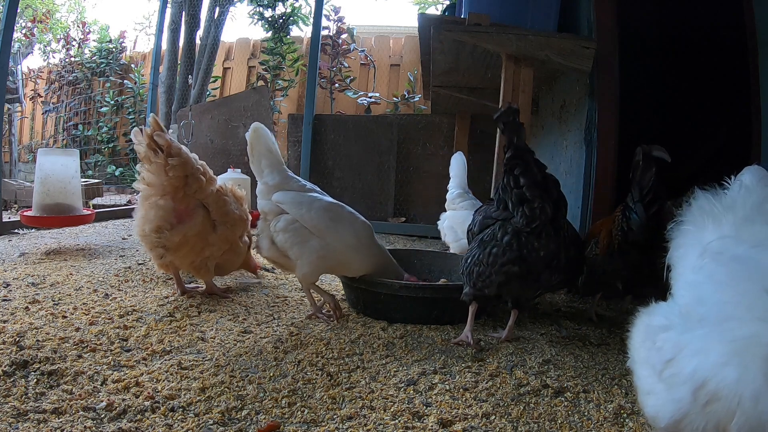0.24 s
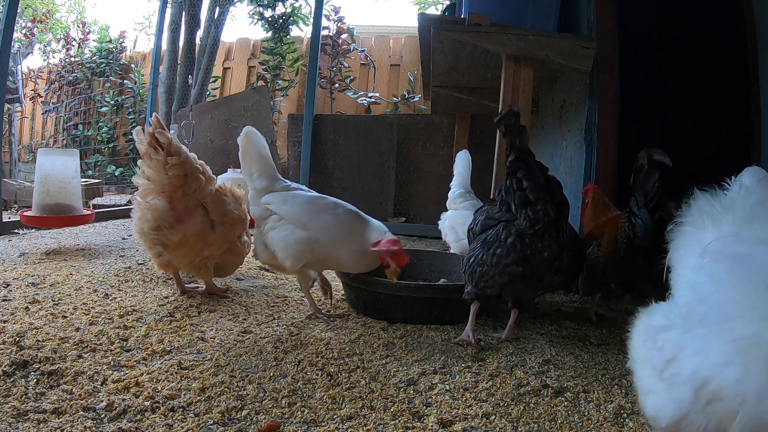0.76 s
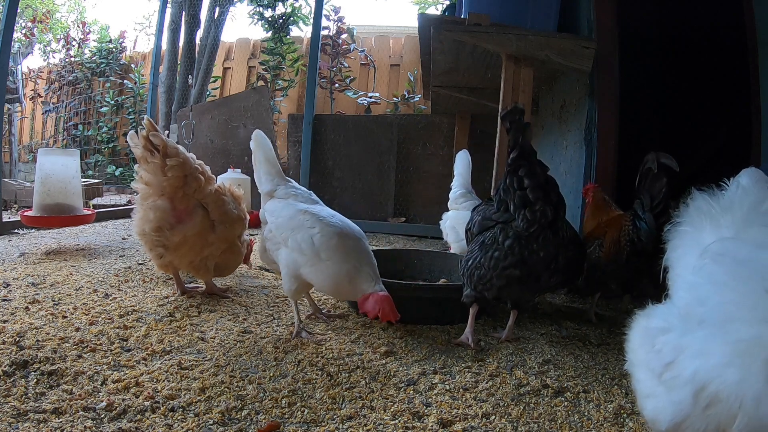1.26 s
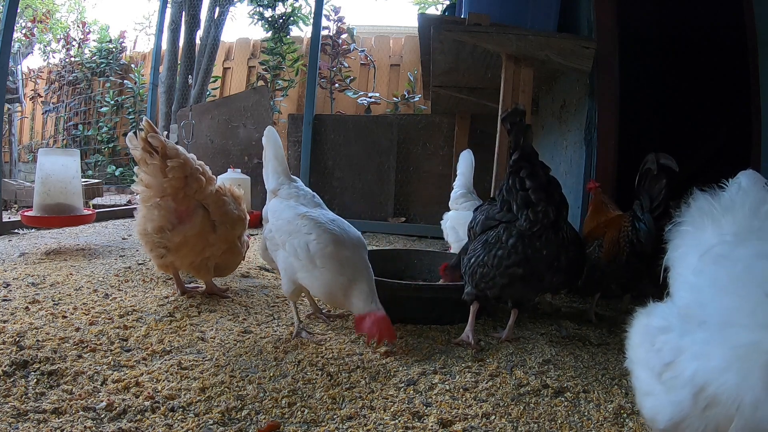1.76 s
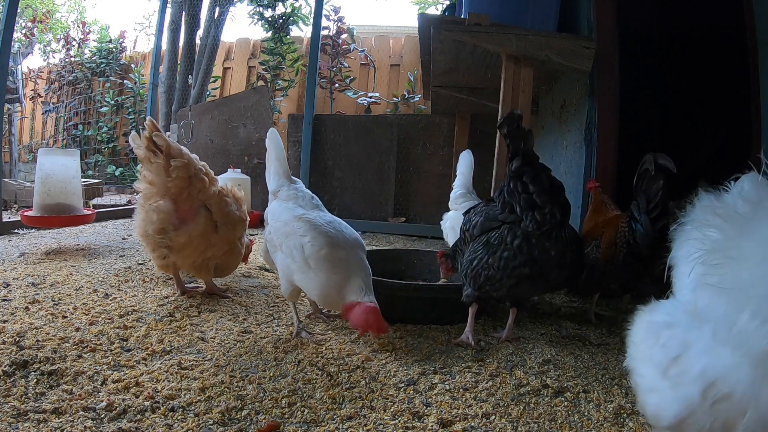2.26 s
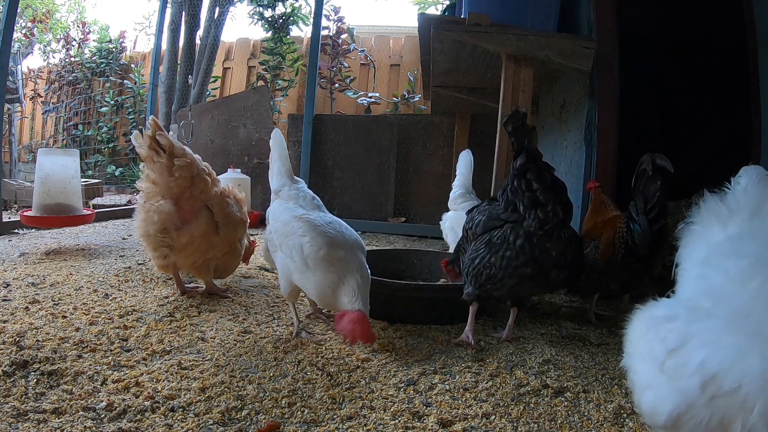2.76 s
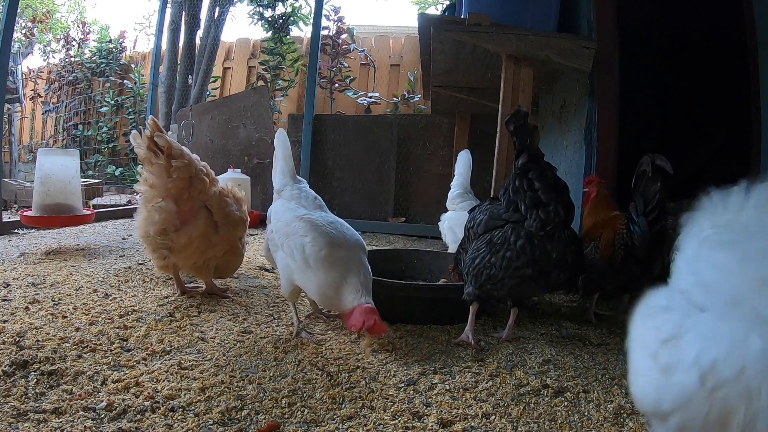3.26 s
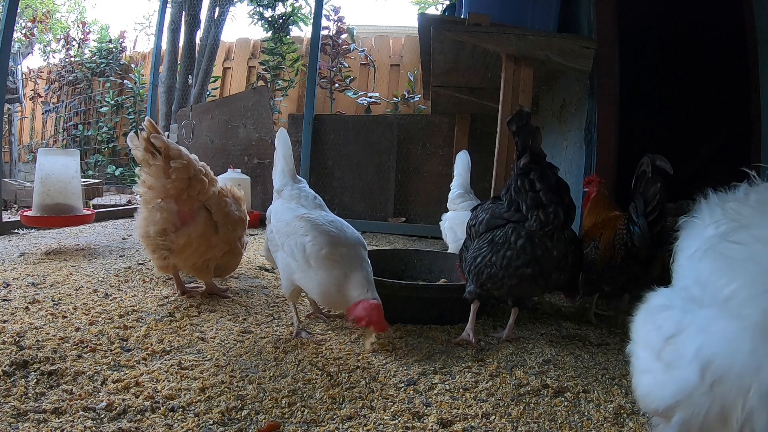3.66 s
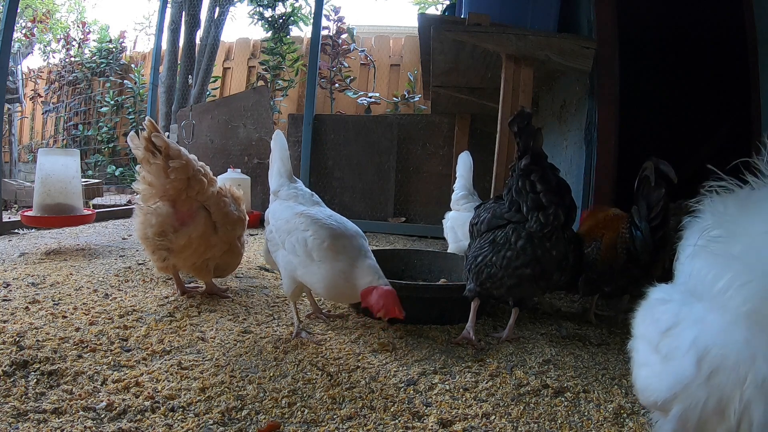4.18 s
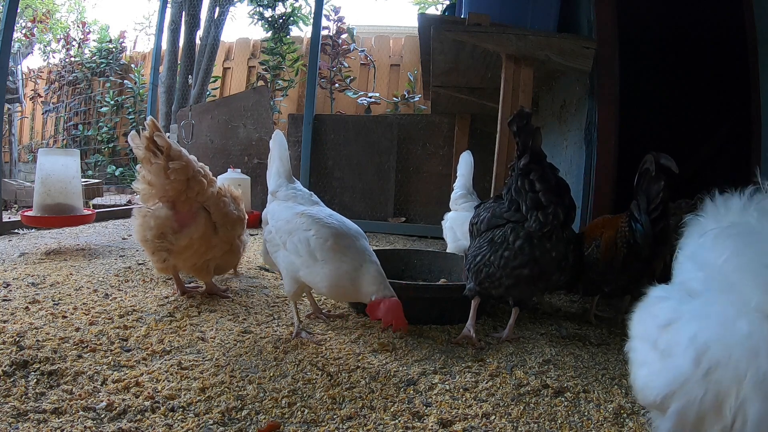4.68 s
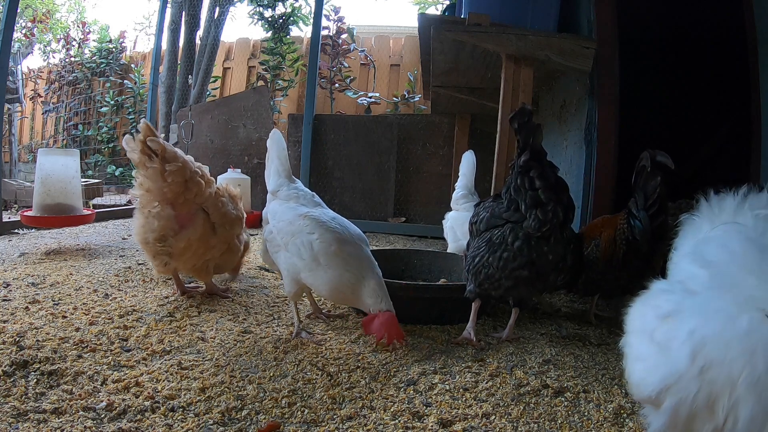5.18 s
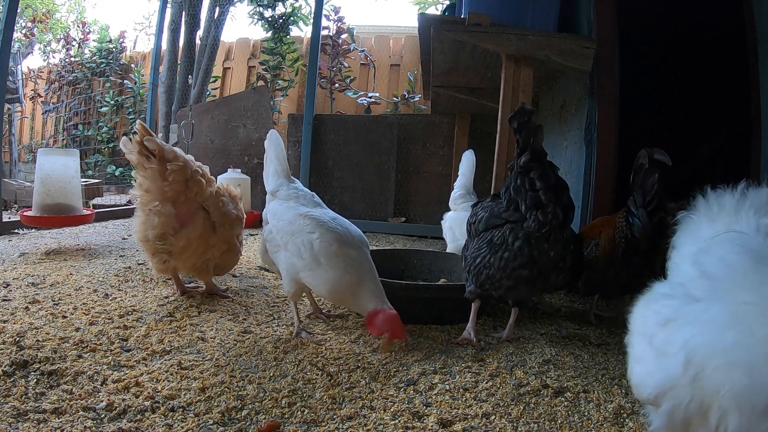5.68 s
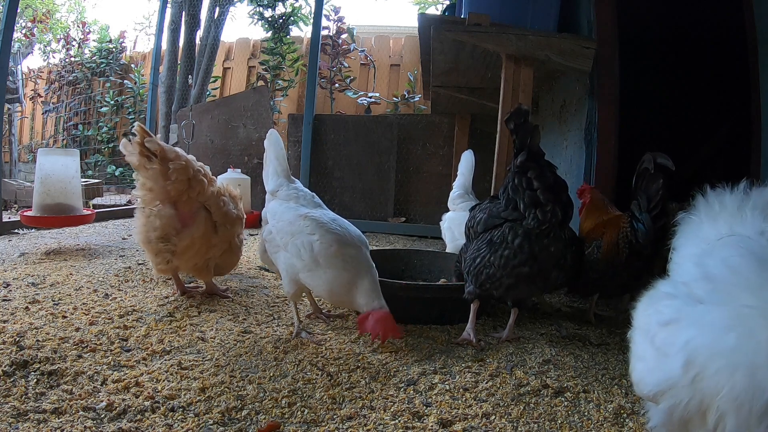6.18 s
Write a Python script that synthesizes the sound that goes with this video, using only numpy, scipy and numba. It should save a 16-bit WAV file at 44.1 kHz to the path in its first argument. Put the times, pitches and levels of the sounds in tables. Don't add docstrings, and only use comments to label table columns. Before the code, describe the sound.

Close chicken cackling: drawn-out rough squawks that break into clear notes, then rapid short rising calls, with soft pecking ticks and wind rumble.

```python
import sys
import numpy as np
from scipy import signal
from scipy.fft import rfft, irfft
from scipy.io import wavfile
from scipy.ndimage import uniform_filter1d
from numba import njit

SR = 44100
rng = np.random.default_rng(int(sys.argv[2]) if len(sys.argv) > 2 else 0)


def to_wav(s):
    ch = np.atleast_2d(s).T
    pcm = np.round(np.clip(ch, -1, 1) * 32767)
    wavfile.write(sys.argv[1], SR, pcm.astype(np.int16))


def invert_db(x):
    u = np.asarray(x, float) / 20
    return 10 ** u


N = 284004

# [start t/s, membranes begin to lock t/s, breath begins to fail t/s, release time/s]
CALLS_S = [
    (0, .88, 1.218, .022),
    (1.612, 2.12, 2.442, 0.018),
    (2.7, 2.897, 3.176, .012),
    (3.395, 3.454, 3.716, .028),
    (3.912, 3.985, 4.186, .03),
    (4.492, 4.63, 4.937, 0.03),
    (5.079, 5.07, 5.223, .038),
    (5.526, 5.54, 5.84, .05),
    (5.977, 5.947, 6.156, 0.038),
]
# [t/s, f/Hz]
PITCH = [
    [(2.13, 360), (2.25, 365), (2.3, 378), (2.328, 384.6), (2.414, 388.2), (2.44, 369.3), (2.47, 367)],
    [(2.93, 350.8), (2.97, 355), (2.99, 369.5), (3.154, 384.9), (3.185, 386.9)],
    [(3.44, 332.1), (3.472, 329.3), (3.528, 364.2), (3.578, 371.2), (3.67, 399), (3.712, 383.5),
     (3.73, 382.7)],
    [(3.99, 346.7), (4.016, 372), (4.088, 387.4), (4.11, 426.8), (4.19, 419.6), (4.22, 372.2)],
    [(4.51, 299.1), (4.558, 353), (4.578, 397.5), (4.658, 420.2), (4.806, 419.4), (4.846, 428.7),
     (4.93, 418.5), (4.985, 382)],
    [(5.08, 308), (5.1, 392), (5.122, 400.5), (5.154, 418.4), (5.22, 422.3), (5.265, 324)],
    [(5.535, 342), (5.573, 410.5), (5.719, 431.4), (5.753, 445.6), (5.831, 453.5), (5.857, 438),
     (5.9, 340.6)],
    [(5.98, 329.0), (5.996, 395), (6.01, 433), (6.028, 439), (6.064, 441.4), (6.146, 432), (6.166, 424),
     (6.19, 339.4)],
]
# [settling time/s, rasp left 0-1, strong-weak beat from t/s, beat depth 0-1]
LOCK = [(.02, 1, 0, 0), (.024, .008, 0, 0), (.014, .01, 0, 0), (.042, .01, 0, 0), (.028, .04, 4.06, .36),
        (.065, .16, 4.68, .28), (.014, .09, 5.14, .12), (.055, .07, 5.73, .25), (.03, .05, 6.05, .36)]
# [treble at start level/dB, as note settles level/dB, at end level/dB,
# 3 kHz mouth cavity at start level/dB, at end level/dB]
GAPE = [(-37, -18.5, -14, -4.5, -9.5), (-21.5, -9.5, -3.5, -8.5, -14), (-13.5, -6, -4, -16, -11),
        (-14, -3, -3, -12, -13), (-10, -5, -3.5, -19.5, -1), (-13, -5, -4, -6, 2),
        (-16, -9.5, -2, 0.5, -0.5), (-13, -0.5, -2, -2.5, -5), (-13.5, -2.5, -3, -13.5, -3.5)]


def hen():
    rasp_share, alternation = syrinx()
    harsh, rough_air = rasp()
    chest, throat, note_air = note(alternation)
    note_share = np.sqrt(1 - rasp_share * rasp_share)
    body = rasp_share * harsh + note_share * throat
    bright = beak(rasp_share * rough_air + note_share * note_air)
    level_db, treble_db = effort()
    t = np.arange(N) / SR
    breath = np.zeros(N)
    for k, (start, _, end, release) in enumerate(CALLS_S):
        opening = (t - start) / 0.0009 + (k == 0)
        closing = (end + release - t) / 0.038 + 1
        breath += np.clip(np.minimum(opening, closing), 0, 1)
    voiced = sum((t > curve[0][0]) * (t < curve[-1][0]) for curve in PITCH)
    chest = uniform_filter1d(voiced * 1.0, size=300) * chest
    return breath * invert_db(level_db - .4) * (body + invert_db(treble_db) * bright + chest)


def syrinx():
    beat_rasp, beat_grows_s, fray, fray_s = .22, .06, .45, .04
    crack_share, crack_s, crack_width_s = .3, 5.78, .025
    t = np.arange(N) / SR
    share, beat = np.ones(N), np.zeros(N)
    for (start, lock, end, release), (settle, left, beat_s, depth) in zip(CALLS_S, LOCK):
        now = (t >= start) & (t < end + release + fray_s)
        beat[now] = depth * np.clip((t[now] - beat_s) / beat_grows_s, 0, 1)
        unlocked = np.exp(-np.maximum(t[now] - lock, 0) / settle)
        frayed = np.clip((t[now] - end) / fray_s + .5, 0, 1)
        share[now] = left + (1 - left) * unlocked + beat_rasp * beat[now] + fray * frayed
    crack = crack_share * np.exp(-((t - crack_s) / crack_width_s) ** 2)
    return np.clip(share + crack, 0, 1), beat


def effort():
    # [attack climb level/dB, top of attack level/dB, last of rasp level/dB,
    # settled note level/dB, end level/dB]
    push = [(-6, -41.5, -31, -31.5, -28), (7.5, -34.5, -30, -33, -34.5), (6.5, -30, -25.5, -33.5, -35),
            (9.5, -26, -27.5, -35, -34), (19, -33.5, -28.5, -36.5, -27.5), (15, -34, -30, -28.5, -27.5),
            (13, -28.5, -28.5, -28, -29), (9, -33, -33.5, -32, -30.5), (14, -32, -31.5, -31.5, -30)]
    attack_s, release_db = 0.022, 19.5
    start, lock, end, release = np.transpose(CALLS_S)
    settled = np.minimum(lock + 2 * np.transpose(LOCK)[0], end)
    climb, first, last, calm, final = np.transpose(push)
    level_db, = by_call([start, start + attack_s, lock, settled, end, end + release],
                        [first - climb, first, last, calm, final, final - release_db])
    treble_db, = by_call([start, settled, end], np.transpose(GAPE)[:3])
    return level_db, treble_db


def rasp(hiss=1.0, halving=0.46, interval=1.2):
    # [t/s, top f/Hz, hold time/s]
    warble = [
        (-.03, 592, 0.024),
        (0.037, 687, 0.026),
        (0.117, 586.5, 0.049),
        (0.209, 634, 0.028),
        (0.291, 673, .02),
    ]
    # [lower membrane f/Hz, rising to f/Hz, upper membrane strength (about 0-1),
    # lower throat level/dB, closing to level/dB]
    membranes = [(530, 590, .9, 5, -3.5), (540.2, 606, 1.1, 3, -5), (513.6, 592, .18, -2.5, -6),
                 (518.5, 570, .2, -4, -8.5), (567, 585, .43, 3, -13.5), (520, 610, 0.6, 0, -13),
                 (600, 600, .36, -8, -8), (579, 580, .42, -9, -6), (590, 550, 0.3, -11, -10)]
    # [f/Hz, width/Hz, level/dB]
    low_throat = [(298, 103, -1.5), (574, 287, -7.5), (755, 62, -1.5)]
    # [f/Hz, width/Hz, level/dB]
    main_throat = [(951, 95, -2.5), (1216, 129, 3.5), (1480, 240, -6.5), (2150, 317, -11)]
    rest_hz, warble_end_s, jitter, burst_db = 492.3, .3, .057, 2.4
    t = np.arange(N) / SR
    start, lock, *_ = np.transpose(CALLS_S)
    first_hz, last_hz, strength, open_db, closed_db = np.transpose(membranes)
    hz, upper, low_db = by_call([start, lock], [first_hz, last_hz], [strength, strength], [open_db, closed_db])
    wild = np.clip((t - warble_end_s) / .12 + 0.24, .22, 1)
    upper_phase = 2 * np.pi * np.cumsum(interval * hz * (1 + jitter / 2 * drift(109.2))) / SR
    for s, top_hz, hold in warble:
        slide = np.clip(1 - (t - s - hold) / .025, 0, 1)
        hz = np.where((t >= s) & (t < warble_end_s), rest_hz + (top_hz - rest_hz) * slide, hz)
    hz = uniform_filter1d(hz, size=300)
    phase = 2 * np.pi * np.cumsum(hz * (1 + jitter * wild * drift(148.9))) / SR
    puffs = pulses(phase, .42 + 0.31 * wild) * (1 + halving * wild * np.cos(phase / 2) * drift(56))
    puffs = puffs + upper * wild ** 2 * pulses(upper_phase, 0.58) * (1 + 0.12 * puffs)
    gated = hiss * wild * rng.standard_normal(N) * (1 + np.cos(phase))
    flow = (puffs + gated) * invert_db(burst_db * wild * np.clip(drift(100), -3, 1.6))
    return even(invert_db(low_db) * tract(flow, low_throat) - tract(flow, main_throat)), flow


def note(alternation):
    # [chest tone under the effort level/dB, upper throat at top pitch level/dB,
    # windpipe at start level/dB, at end level/dB, lower throat f/Hz]
    colour = [(-22.5, 1, -6, 3, 760), (-23, 2, 1, 1, 770), (-22, 6, -6, -10, 770), (-18, 3, -2, 8, 830),
              (-19, 0, 7, 0, 845), (-18, -3, 14, 0, 840), (-13.5, 5, 0, 0, 840), (-13, 6, 11, 7, 860)]
    # [f/Hz, width/Hz, level/dB]
    upper_throat = [(1570, 430, -4), (2100, 338, -5)]
    throat_db_per_hz = 0.17
    jitter, shimmer_db, flicker_db = .004, 1.2, 2.5
    steady_rough, beat_rough, hiss = .1, 1.0, 1.7
    rows = []
    for curve, (chest, upper, early, late, low) in zip(PITCH, colour):
        top = max(np.transpose(curve)[1])
        for s, hz in curve:
            windpipe = np.interp(s, [curve[0][0], curve[-1][0]], [early, late])
            rows.append((s, hz, top, chest, upper, windpipe, low))
    hz, top_hz, chest_db, open_db, windpipe_db, low_hz = in_time(rows)
    open_db = open_db - throat_db_per_hz * (top_hz - hz)
    phase = 2 * np.pi * np.cumsum(hz * (1 + jitter * drift(25))) / SR
    swell = invert_db(shimmer_db * drift(12))
    roughness = (steady_rough + beat_rough * alternation) * drift(250)
    puffs = snaps(phase) * (1 + alternation * np.cos(phase / 2) + roughness) * swell
    gated = hiss * rng.standard_normal(N) * (1 + .5 * np.cos(phase))
    lower = invert_db(flicker_db * drift(15)) * moving_resonance(puffs, low_hz, 200)
    windpipe = invert_db(windpipe_db - 9.5) * tract(puffs, [(1272, 280, 0.002)])
    throat = lower - windpipe + invert_db(open_db - 9.0) * tract(puffs, upper_throat)
    return invert_db(chest_db + 12.0) * np.sin(phase), even(throat), puffs + gated


def beak(x, width_hz=450, upper_db=-1.5, top_db=-7.0):
    # [lower at start f/Hz, at end f/Hz, upper at start f/Hz, at end f/Hz, upper cavity level/dB]
    resonances = [(3100, 3790, 5300, 6710, -8.5), (3780, 3380, 6590, 6210, -8.5),
                  (3600, 3710, 6210, 6170, -17.5), (3670, 3650, 6230, 6230, -14),
                  (3630, 3680, 6500, 5710, -14.5), (3560, 3550, 5980, 5500, -9.5),
                  (3530, 3690, 5700, 5790, -12), (3730, 3790, 5920, 6140, -11),
                  (3681, 3780, 6166, 5960, -13.5)]
    patchy_db, air_db = 2.5, -41
    start, _, end, _ = np.transpose(CALLS_S)
    shape = np.transpose(resonances)
    lower_hz, upper_hz, first_db, second_db = by_call(
        [start, end], shape[:2], shape[2:4], np.transpose(GAPE)[3:], shape[[4, 4]])
    lower, upper, top = (moving_resonance(x, hz, width_hz) * invert_db(patchy_db * drift(14))
                         for hz in (lower_hz, upper_hz, 1.204 * upper_hz))
    first_cavity = invert_db(first_db) * tract(x, [(3000, 373, 0.0032)])
    second_cavity = invert_db(second_db) * tract(x, [(4320, 660, 0.049)])
    y = first_cavity + second_cavity - lower - invert_db(upper_db) * upper
    y = y + invert_db(top_db) * (top - tract(x, [(9300, 2000, -13.5)]))
    y = signal.sosfilt(signal.butter(5, (2780, 8700), "band", fs=SR, output="sos"), y)
    return even(y + invert_db(air_db) * tract(x, [(13100, 2000, 0.0028)]))


def pulses(phase, sharp=0.9916):
    return (1 - sharp ** 2) / (1 - 2 * sharp * np.cos(phase) + sharp ** 2) - 1


def snaps(phase, count=34):
    return np.sin((count + .5) * phase) / (np.sin(phase / 2) + 1e-12) - 1


def resonate(x, hz, width):
    r = np.exp(-np.pi * width / SR)
    return signal.lfilter(np.array([1, 0, -1]) * (1 - r * r) / 2, [1, -2 * r * np.cos(2 * np.pi * hz / SR), r * r], x)


def tract(x, modes):
    out = 0
    for k, (hz, width, level_db) in enumerate(modes):
        once = resonate(x, hz, 1.98 * width)
        out = out + (-1) ** k * invert_db(level_db) * resonate(once, hz, 1.98 * width)
    return out


def moving_resonance(x, hz, width):
    r = np.exp(-np.pi * width / SR)
    return glide(x, 2 * r * np.cos(2 * np.pi * hz / SR), r)


@njit
def glide(x, pull, r):
    for _ in range(2):
        y = np.zeros(len(x))
        for i in range(2, len(x)):
            y[i] = (1 - r * r) / 2 * (x[i] - x[i - 2]) + pull[i] * y[i - 1] - r * r * y[i - 2]
        x = y
    return x


def even(y):
    return y / np.sqrt(uniform_filter1d(y ** 2, size=3000) + 1e-12)


def rms_one(x):
    return x / np.sqrt(np.mean(x ** 2) + 1e-20)


def drift(rate):
    r = np.exp(-2 * np.pi * rate / SR)
    wander = signal.lfilter([1], [1, -2 * r, r * r], rng.standard_normal(N + SR // 8))
    return rms_one(wander[SR // 8:])


def in_time(rows):
    s, *columns = np.transpose(rows)
    return [np.interp(np.arange(N) / SR, s, c) for c in columns]


def by_call(moments, *columns):
    s = np.maximum.accumulate(np.transpose(moments).ravel())
    return in_time(np.transpose([s] + [np.transpose(c).ravel() for c in columns]))


def ticks(events, decay_s, broad, cut_hz):
    out, t = np.zeros(N), np.arange(1800) / SR
    for s, peak_db, hz in events:
        puff = rng.standard_normal(1800) * np.exp(-t / decay_s)
        out[round(s * SR):][:1800] += invert_db(peak_db - 6.0) * (4.4 * resonate(puff, hz, 0.24 * hz) + broad * puff)
    return signal.sosfilt(signal.butter(2, cut_hz, fs=SR, output="sos"), out + 1e-18)


def shed(x):
    t60_s, level_db, low_cut_hz = 0.23, 0, 450
    hollow_hz, hollow_width_hz, hollow_t60_s, hollow_db = 770, 120, .47, -18
    t = np.arange(SR // 2) / SR
    white = rng.standard_normal((2, len(t))) * (t > .003)
    hollow = resonate(white * invert_db(hollow_db - 60 * t / hollow_t60_s), hollow_hz, hollow_width_hz)
    echoes = white * invert_db(-60 * t / t60_s) + hollow
    echoes = signal.sosfilt(signal.butter(2, low_cut_hz, "high", fs=SR, output="sos"), echoes)
    echoes /= np.sqrt(np.sum(echoes ** 2, axis=1)[:, None])
    return invert_db(level_db) * signal.fftconvolve(echoes, x[None], axes=1)[:, :N]


def gusts():
    # [arrives t/s, hold time/s, boom level/dB]
    blows = [(0, .01, -65), (0.344, .1, -72), (2.151, .06, -70), (3.213, .01, -61), (3.42, 0.15, -58.5),
             (3.639, 0.17, -51), (4.164, 0.021, -41.5), (4.5, .1, -44), (4.68, 0.079, -40),
             (4.85, 0.077, -45), (5.14, 0.19, -42), (5.42, .04, -46), (5.6, .1, -44), (6.04, .15, -47.5)]
    boom_hz, rise_db_per_s, fall_db_per_s = 56.2, 220, 110
    t = np.arange(N) / SR
    levels = []
    for s, hold, boom_db in blows:
        rise = rise_db_per_s * np.maximum(s - t, 0)
        fall = fall_db_per_s * np.maximum(t - s - hold, 0)
        levels.append(boom_db - rise - fall)
    white = rng.standard_normal((2, N))
    boom = resonate(resonate(white[0], boom_hz, 6), boom_hz, 18)
    rumble = signal.sosfilt(signal.butter(2, [24, 200], "band", fs=SR, output="sos"), white[1])
    return invert_db(np.max(levels, axis=0)) * (rms_one(boom) + invert_db(-6.5) * rms_one(rumble))


def hum():
    phase = 2 * np.pi * np.cumsum(172.7 + 2.5 * drift(8.3)) / SR
    return invert_db(-58 + 1.7 * drift(13)) * np.sqrt(2) * np.sin(phase)


def yard():
    # [f/Hz, level per Hz/dB]
    spectrum = [(30, -24.5), (110, -32), (250, -27), (550, -48), (820, -36), (1740, -51.5), (8000, -56.5),
                (12000, -80.5)]
    hz = np.maximum(np.arange(N // 2 + 1) * SR / N, 1)
    shape_hz, shape_db = np.transpose(spectrum)
    shape = invert_db(np.interp(np.log(hz), np.log(shape_hz), shape_db))
    mid, side = rfft(rng.standard_normal((2, N)))
    side = side * np.clip(hz / 900, .25, 1)
    return invert_db(-65.5) * rms_one(irfft(shape * np.array([mid + side, mid - side]), N))


def scene():
    # [t/s, peak level/dB, ring f/Hz]
    gulps = [
        (1.566, -49, 832.6),
        (2.671, -39.5, 1040),
        (3.372, -38.5, 1700),
        (3.908, -41, 1053),
        (4.356, -50, 800),
        (4.459, -57, 895.5),
        (5.499, -46, 1002),
    ]
    # [t/s, peak level/dB, ring f/Hz]
    squeaks = [
        (2.6813, -45, 1812),
        (3.3852, -27.5, 1780),
    ]
    # [t/s, peak level/dB, ring f/Hz]
    pecks = [
        (0.2364, -60, 4155),
        (0.287, -45.5, 6940),
        (0.2955, -44, 6000),
        (1.1144, -42.5, 6350),
        (1.418, -73, 6010),
        (1.593, -64, 4310),
        (3.8397, -60, 9954),
        (3.8794, -53, 10020),
    ]
    # [left minus right at start level/dB, at end level/dB]
    heading = [(1, .5), (.5, .5), (.5, .5), (.5, 0), (.5, .5), (0, 0), (-.5, 0), (1, 1), (3, 3)]
    shadow_hz, shadow_width_hz = 820, 1000
    near = hen() + ticks(gulps, 0.0055, 1.0, 3200) + ticks(squeaks, 0.0036, .05, 4000)
    near = near + ticks(pecks, 0.0071, 0.68, 11000)
    direct = signal.sosfilt(signal.butter(1, 5300, fs=SR, output="sos"), near)
    left, right = direct + shed(near)
    dip = 0.48 * resonate(left, shadow_hz, shadow_width_hz)
    lift = .4 * resonate(right, shadow_hz, shadow_width_hz)
    wind = gusts()
    uneven = 1.06 + .12 * drift(15)
    start, _, end, _ = np.transpose(CALLS_S)
    turn_db, = by_call([start, end], np.transpose(heading))
    voice = np.array([(left - dip) * invert_db(turn_db / 2), (right + lift) * invert_db(-turn_db / 2)])
    return voice + yard() + hum() + [wind, wind * uneven]


def band_limit(x):
    return signal.sosfilt(signal.butter(12, 15600, fs=SR, output="sos"), x)


def record(dry):
    return band_limit(dry)


dry = scene()
out = record(dry)
to_wav(out)
```